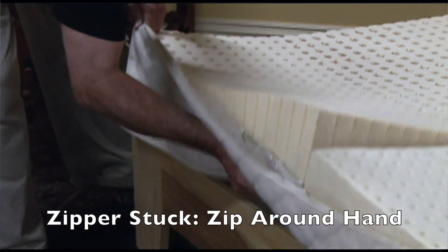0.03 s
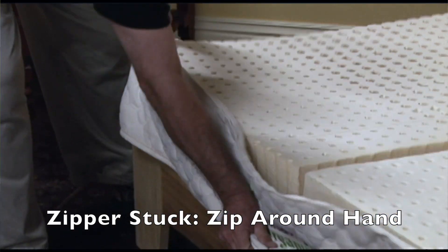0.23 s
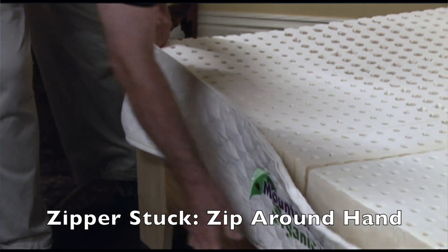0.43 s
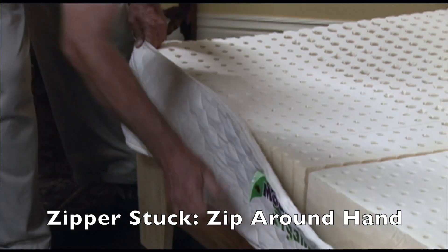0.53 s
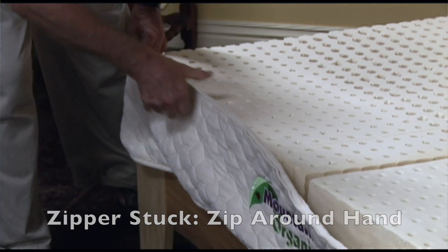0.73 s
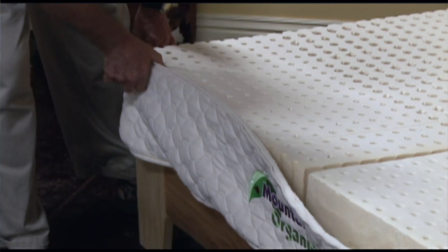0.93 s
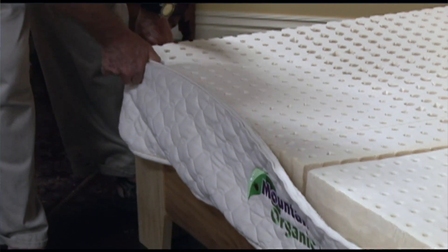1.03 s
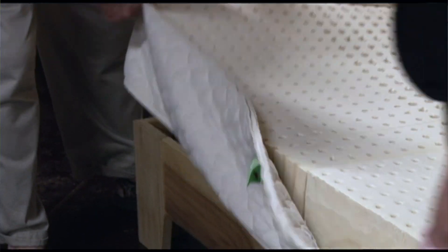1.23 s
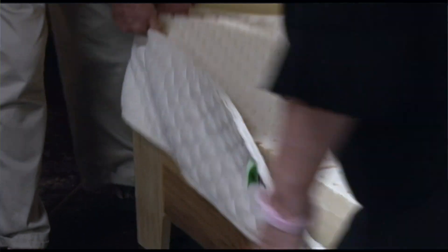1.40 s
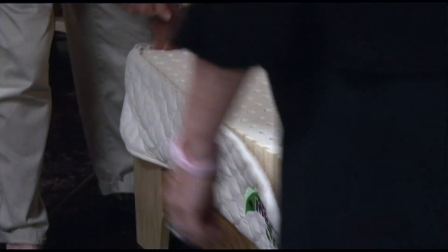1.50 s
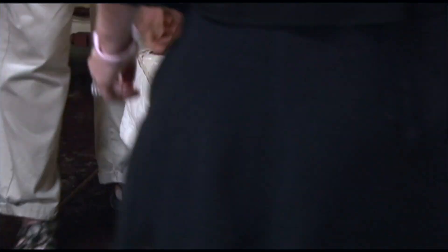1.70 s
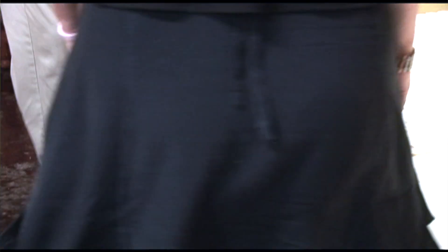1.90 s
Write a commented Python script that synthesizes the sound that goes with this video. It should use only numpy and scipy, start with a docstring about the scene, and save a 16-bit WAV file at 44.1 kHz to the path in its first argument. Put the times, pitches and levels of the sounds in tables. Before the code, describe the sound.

After a faint tug of fabric, a heavy mattress layer lands on a wooden bed at about 0.25 seconds: a dull thump with a brief slat rattle and short room echo. Hands faintly rub the cover from 0.6 to 1.4 seconds. Soft shuffling steps and cloth crinkles come around 1.5, then clothing swishes twice near 1.9. A faint hum and low rumble lie underneath.

```python
"""A quiet bedroom, where a heavy latex mattress layer flops onto a wooden bed.
Its face slaps down, then a quick run of dull impacts excites the frame's modes, rattles the slats
and reverberates in the room. Friction makes the rustle as hands smooth the quilted cover and someone
steps past close by with a swish of clothing. An appliance hums faintly over air noise and a low rumble."""
import sys
import numpy as np
from scipy import signal
from scipy.io import wavfile

SR = 44100
rng = np.random.default_rng(int(sys.argv[2]) if len(sys.argv) > 2 else 0)


def file_out(sig):
    """Save sig as 16-bit WAV at sys.argv[1]."""
    # one column per channel
    cols = np.atleast_2d(sig).T
    # limit, then scale
    lim = np.clip(cols, -1, 1)
    pcm = np.round(lim * 32767).astype(np.int16)
    wavfile.write(sys.argv[1], SR, pcm)


N = 85995
TIME = np.arange(N) / SR
EDGES_HZ = 22 * 2 ** np.arange(0, 9.7, .4)
CENTRES_HZ = np.sqrt(EDGES_HZ[1:] * EDGES_HZ[:-1])

# stereo balance: frequency_hz, left_minus_right_db
BALANCE = [(100, -8.5), (200, -3.8), (350, -2), (550, -1.5), (1200, -0.6), (2400, -0.5), (12000, -.3)]
# likeness of left and right in the slats' rattle: frequency_hz, coherence_ratio
NEAR_COHERENCE = [(100, .99), (600, 0.36), (2000, 0.82), (8000, 1), (13000, .95)]
# the same for the other broadband noises: frequency_hz, coherence_ratio
FAR_COHERENCE = [(100, 1), (500, 0.65), (1200, 0.57), (7000, 0.68), (13000, 0.96)]

# partials of the appliance: pitch_hz, level_db
HUM_PARTIALS = [(58, -50), (119, -49), (180, -50.5)]
# steady air noise: frequency_hz, density_db
AIR_SPECTRUM = [(25, -2), (52, -21), (75, -3), (110, -5), (180, -7.5), (330, -8.5), (650, -11.5),
                (850, -16), (2000, -19.5), (3700, -24.5), (7000, -32.5), (15500, -46)]
# background rumble: frequency_hz, density_db
RUMBLE_SPECTRUM = [(30, -38), (80, -10), (115, 2.5), (185, 3), (260, -7.5), (400, -41)]
# its slow rise and fall: time_s, level_db
RUMBLE_LEVELS = [(0, -45), (0.1, -41.5), (0.55, -42.5), (0.8, -46.5), (0.95, -42), (1.3, -43),
                 (1.45, -43.5), (1.95, -44)]

# steps and shifts of weight: peak_s, half_width_s, level_db
SHUFFLE_STROKES = [(0.01, 0.04, -42.5), (1.506, 0.028, -39), (1.548, 0.02, -42), (1.612, 0.019, -36.5),
                   (1.643, 0.022, -42)]
# friction of the steps: frequency_hz, density_db
SHUFFLE_SPECTRUM = [(60, -23), (170, -1), (350, 0), (520, -1), (750, -8), (1500, -12.5), (4000, -25.5),
                    (7000, -28.5), (15000, -47)]
# clothing sweeps past: peak_s, half_width_s, level_db
SWISH_STROKES = [(1.868, 0.032, -44.5), (1.94, 0.047, -43)]
# friction of the clothing: frequency_hz, density_db
SWISH_SPECTRUM = [(200, -2), (900, -2), (1500, 3), (2300, 0), (3300, 0), (4700, -4), (7000, -13.5),
                  (15000, -21)]
# creases snap: start_s, level_db
CREASE_SNAPS = [(1.438, -44), (1.474, -52), (1.511, -47), (1.535, -39.5), (1.557, -39), (1.591, -41),
                (1.607, -41.5)]
# noise of a snap: frequency_hz, density_db
CREASE_SPECTRUM = [(400, -5), (1200, 3.5), (2500, -1), (4200, -0.5), (6000, -24), (15000, -25)]
# hands rub the cover: peak_s, half_width_s, level_db
RUB_STROKES = [(0.15, 0.045, -55.5), (0.645, 0.018, -49.5), (0.684, 0.021, -48.5), (0.755, 0.029, -48.5),
               (0.84, 0.095, -59.5), (1.245, 0.025, -53), (1.37, 0.092, -54)]
# friction of the cover: frequency_hz, density_db
COVER_SPECTRUM = [(200, -10), (700, 0.5), (2000, -0.5), (3300, -5.5), (5700, -9), (9000, -20), (15000, -32)]

# reverberant field: frequency_hz, density_db
ROOM_SPECTRUM = [(60, -29), (190, -21), (290, -1), (400, -6), (500, 0), (700, -2.5), (1100, -7.5),
                 (1600, -6), (2500, -13), (4000, -25.5), (6000, -43), (15000, -58)]
# reverberation time: frequency_hz, t60_s
ROOM_DECAY = [(100, 0.53), (500, 0.58), (2000, 0.64), (8000, 0.34)]
# slap of the layer's face: frequency_hz, density_db
SLAP_SPECTRUM = [(600, -8), (1500, -12), (3300, 10.5), (4500, -2), (5500, -18), (8000, -18), (13000, -33),
                 (16000, -36)]
# dense rattle of the slats: frequency_hz, density_db
RATTLE_SPECTRUM = [(50, -34), (110, -18), (250, -4), (550, -5.5), (800, -2), (1100, -5), (1500, -10.5),
                   (2600, -16.5), (4200, -28), (5600, -60), (8000, -54), (15000, -65)]
# normal modes of the wooden frame: pitch_hz, gain_db, t60_s
WOOD_MODES = [(101.4, -32, 0.15), (205.5, -25, 0.11), (266.6, -22.5, 0.24), (287.7, -20.5, 0.19),
              (398, -33, 0.067), (465.8, -30, 0.49), (538.4, -15, .2), (736, -29, 0.071),
              (808.5, -29.5, 0.21), (1041, -21.5, 0.082), (1158, -26, 0.13), (1232, -35, 0.15),
              (1528, -30.5, 0.2), (1773, -38, 0.15), (2144, -38, .4), (2645, -40, 0.5)]
# the layer meets the frame: start_s, relative_level_db, tilt_db_per_octave
IMPACTS = [(0.205, -26, 1.5), (0.211, -16, -6.5), (0.2319, -7.5, 1.5), (0.2454, 5, -3),
           (0.2544, -5.5, -0.5), (0.2588, -3.5, -7), (0.267, -3.5, -1), (0.275, -11, 2.5),
           (0.304, -12.5, 0.5), (0.356, -13.5, -1.5)]


def from_db(db):
    """Amplitude ratio: tenfold for every 20 dB."""
    return 10 ** (np.asarray(db) / 20)


def at_hz(points, hz):
    """Interpolation of a table on a logarithmic frequency axis."""
    table_hz, values = np.transpose(points)
    return np.interp(np.log(hz), np.log(table_hz), values)


def unit_rms(x):
    """Normalisation to unit mean power."""
    return x / np.sqrt(np.mean(x ** 2) + 1e-20)


def bandpass(x, edges_hz):
    """Butterworth filtering passes the band between two edges."""
    return signal.sosfilt(signal.butter(2, edges_hz, "band", fs=SR, output="sos"), x)


def drift(rate_hz):
    """Low-passed noise wanders smoothly with unit spread."""
    pole = np.exp(-2 * np.pi * rate_hz / SR)
    return unit_rms(signal.lfilter([1], [1, -2 * pole, pole * pole], rng.standard_normal(2 * N))[N:])


def pan(hz):
    """A level difference between the channels draws the bass to the right."""
    return unit_rms(from_db(at_hz(BALANCE, hz) * np.array([[.5], [-.5]])))


def noise(spectrum, envelope=lambda hz: 1, coherence=FAR_COHERENCE):
    """Partly coherent stereo noise: bands share unit power, then each follows envelope(hz)."""
    white = rng.standard_normal((2, 2, N + SR // 4))
    gains = from_db(at_hz(spectrum, CENTRES_HZ)) * np.sqrt(np.diff(EDGES_HZ))
    out = 0
    for k, (hz, gain) in enumerate(zip(CENTRES_HZ, gains / np.linalg.norm(gains))):
        mid, side = unit_rms(bandpass(white[k % 2], EDGES_HZ[k:k + 2])[:, -N:])
        alike = at_hz(coherence, hz)
        pair = np.sqrt((1 + alike) / 2) * mid + np.sqrt((1 - alike) / 2) * side * [[1], [-1]]
        out = out + gain * pan(hz) * pair * envelope(hz)
    return out


def impulses(start_s, level_db):
    """Ideal impulses: one sample for each event."""
    clicks = np.zeros(N)
    clicks[(start_s * SR).astype(int)] = from_db(level_db)
    return clicks


def impacts(hz):
    """Impulsive excitation at one frequency: each knock has its own spectral tilt."""
    start_s, level_db, tilt = np.transpose(IMPACTS)
    octaves = np.log2(np.clip(hz, 300, 4000) / 600)
    return impulses(start_s, level_db + tilt * octaves)


def decay(clicks, attack_s, t60_s):
    """Amplitude envelope of energy that builds after each click and decays exponentially."""
    fall = from_db(-120 / (t60_s * SR))   # acts on energy: 60 dB in t60_s
    rise = np.exp(-1 / (attack_s * SR))
    return np.sqrt(signal.lfilter([1 - rise], [1, -rise - fall, rise * fall], clicks ** 2 + 1e-18))


def burst(events, spectrum, attack_s, t60_s):
    """Broadband transients: decaying noise for each (start_s, level_db) row."""
    envelope = decay(impulses(*np.transpose(events)), attack_s, t60_s)
    return noise(spectrum, lambda hz: envelope)


def ring(clicks, hz, t60_s):
    """A damped oscillator answers a unit impulse with a decaying sinusoid of height 1."""
    radius = from_db(-60 / (t60_s * SR))
    angle = 2 * np.pi * hz / SR
    return signal.lfilter([.5, 0, -.5], [1, -2 * radius * np.cos(angle), radius ** 2], clicks + 1e-18)


def swell(strokes):
    """Incoherent strokes add in power, each a Gaussian in time."""
    return np.sqrt(sum(from_db(db) ** 2 * np.exp(-((TIME - peak_s) / half_width_s) ** 2)
                       for peak_s, half_width_s, db in strokes))


def friction(strokes, spectrum, roughness, slips_per_s=440, slip_s=0.0056):
    """Stick-slip friction: tiny random catches carry a share of the power of a smooth hiss."""
    slips = (rng.random(N) < slips_per_s / SR) * rng.random(N)
    slip_energy = signal.lfilter([1], [1, -np.exp(-1 / (slip_s * SR))], slips ** 2 + 1e-18)
    grain = unit_rms(np.sqrt(slip_energy))
    envelope = swell(strokes) * np.sqrt(1 - roughness + roughness * grain ** 2)
    return noise(spectrum, lambda hz: envelope)


def weave(peak_s, half_width_s, level_db, pitch_hz, band_hz):
    """Nearly periodic contact of thread over thread gives a narrow, pitched hiss."""
    hiss = bandpass(noise(COVER_SPECTRUM), [pitch_hz - band_hz / 2, pitch_hz + band_hz / 2])
    return swell([(peak_s, half_width_s, level_db)]) * unit_rms(hiss)


def room_tone(air_db=-46.5):
    """Stationary air noise lies under a rumble with slow amplitude modulation."""
    rumble_level = from_db(np.interp(TIME, *np.transpose(RUMBLE_LEVELS)))
    return from_db(air_db) * noise(AIR_SPECTRUM) + rumble_level * noise(RUMBLE_SPECTRUM)


def appliance_hum(waver_db=2.5, waver_rad=0.77, waver_hz=1.33):
    """Random amplitude and phase modulation makes three low partials waver."""
    hum = 0
    for hz, db in HUM_PARTIALS:
        amplitude = np.sqrt(2) * from_db(db + waver_db * drift(waver_hz))
        phase = 2 * np.pi * hz * TIME + waver_rad * drift(waver_hz)
        hum = hum + pan(hz) * amplitude * np.sin(phase)
    return hum


def steps():
    """Sliding friction gives low shuffles and one brief scuff."""
    scuff = weave(peak_s=1.83, half_width_s=0.01, level_db=-44.5, pitch_hz=1060, band_hz=610)
    return friction(SHUFFLE_STROKES, SHUFFLE_SPECTRUM, roughness=0.33) + scuff


def zing(peak_s=1.935, half_width_s=0.051, level_db=-44, pitch_hz=2320, band_hz=710, sag_hz_per_s=7000):
    """The pitch of ribbed cloth follows sliding speed, so it sinks as the second sweep slows."""
    hz = pitch_hz - sag_hz_per_s * np.clip(TIME - peak_s, -.1, .1)
    phase = 2 * np.pi * np.cumsum(hz) / SR
    lowpass = signal.butter(2, band_hz / 2, fs=SR, output="sos")
    in_phase, quadrature = signal.sosfilt(lowpass, rng.standard_normal((2, N)))
    hiss = unit_rms(in_phase * np.cos(phase) + quadrature * np.sin(phase))
    return swell([(peak_s, half_width_s, level_db)]) * hiss


def clothing():
    """Creases snap as short transients, then cloth-on-cloth friction swishes twice."""
    snaps = burst(CREASE_SNAPS, CREASE_SPECTRUM, attack_s=0.00055, t60_s=0.081)
    return snaps + friction(SWISH_STROKES, SWISH_SPECTRUM, roughness=.2) + zing()


def quilted_cover():
    """Friction sounds in the cover as it is tugged once and smoothed by hand."""
    tug = weave(peak_s=.005, half_width_s=.035, level_db=-43.5, pitch_hz=1530, band_hz=650)
    return tug + friction(RUB_STROKES, COVER_SPECTRUM, roughness=0.43)


def reverberation(gain_db=-27, build_s=0.014):
    """The knocks feed a diffuse field whose decay time depends on frequency."""
    field = noise(ROOM_SPECTRUM, lambda hz: decay(impacts(hz), build_s, at_hz(ROOM_DECAY, hz)))
    return from_db(gain_db) * field


def slat_rattle(gain_db=-17, attack_s=0.0018, t60_s=0.12):
    """After each knock the slats' dense collisions merge into decaying noise."""
    rattle = noise(RATTLE_SPECTRUM, lambda hz: decay(impacts(hz), attack_s, t60_s), NEAR_COHERENCE)
    return from_db(gain_db) * rattle


def latex_slap(start_s=.2312, level_db=-34.5):
    """Abrupt contact of the layer's face makes a bright transient just before the main weight lands."""
    return burst([(start_s, level_db)], SLAP_SPECTRUM, attack_s=0.00045, t60_s=0.21)


def frame_thump(pulse_db=14, pulse_band_hz=(338, 1070), foam_cutoff_hz=3150):
    """Each impact radiates a blunt pressure pulse and excites the modes; soft foam low-passes both."""
    middle_hz = np.sqrt(np.prod(pulse_band_hz))
    pulse = from_db(pulse_db) * pan(middle_hz) * bandpass(impacts(middle_hz) + 1e-18, pulse_band_hz)
    modes = sum((-1) ** k * from_db(db) * pan(hz) * ring(impacts(hz), hz, t60_s)
                for k, (hz, db, t60_s) in enumerate(WOOD_MODES))
    foam = signal.butter(4, foam_cutoff_hz, fs=SR, output="sos")
    return signal.sosfilt(foam, pulse + modes)


def scene():
    """Superposition: the pressures of background, rustling and landing add."""
    background = room_tone() + appliance_hum()
    rustling = steps() + clothing() + quilted_cover()
    landing = reverberation() + slat_rattle() + latex_slap() + frame_thump()
    return background + rustling + landing


def record(dry, cutoff_hz=15750):
    """Band limiting: an elliptic low-pass cuts the top of the treble steeply."""
    return signal.sosfilt(signal.ellip(12, .1, 90, cutoff_hz, fs=SR, output="sos"), dry)


dry = scene()
out = record(dry)
file_out(out)
```